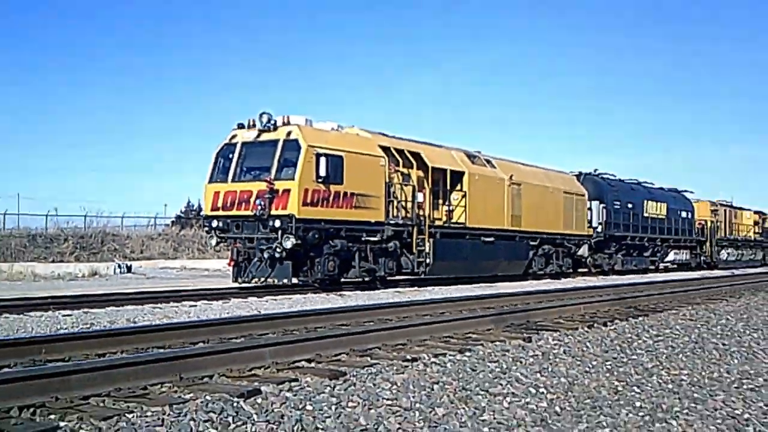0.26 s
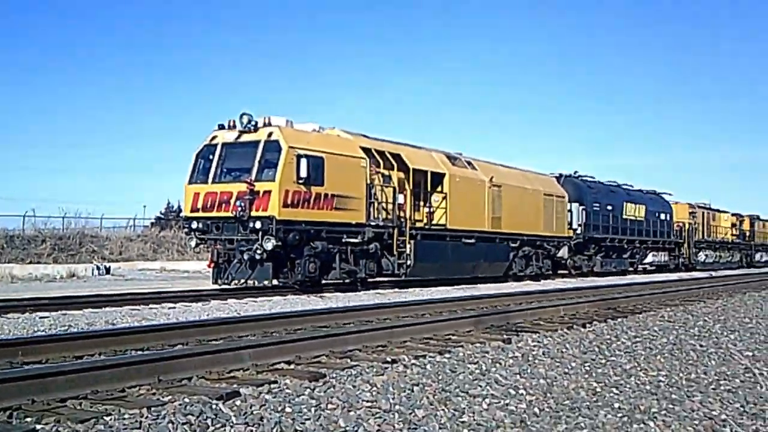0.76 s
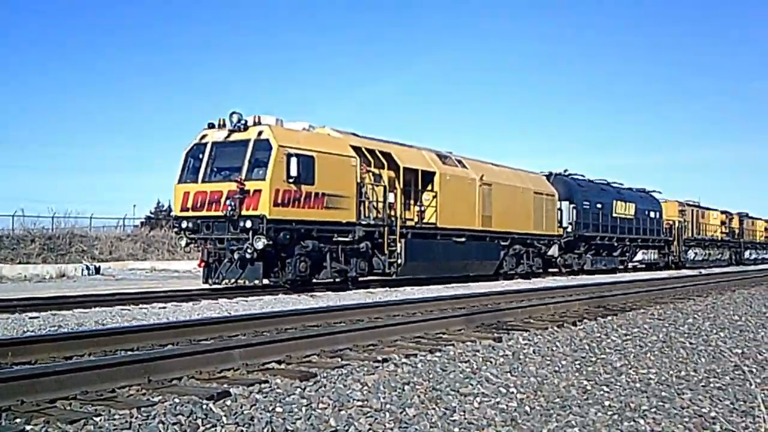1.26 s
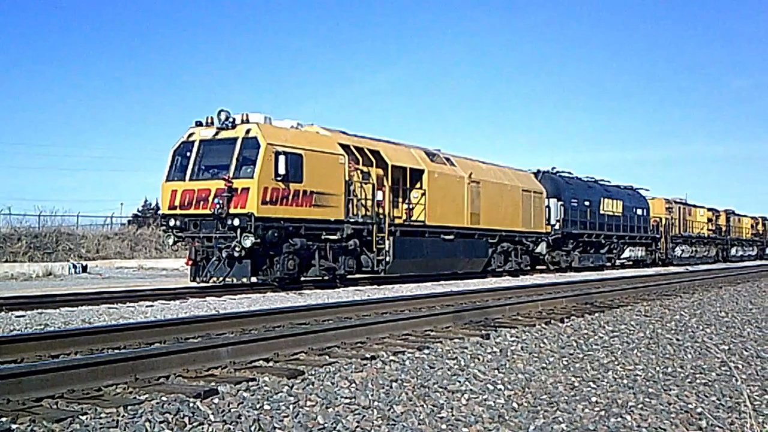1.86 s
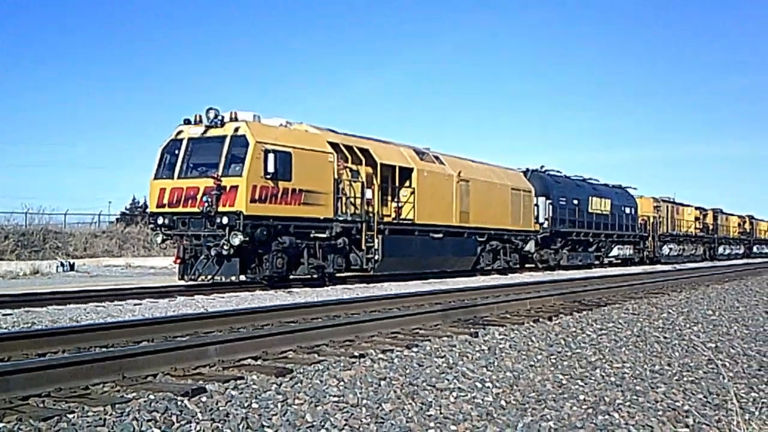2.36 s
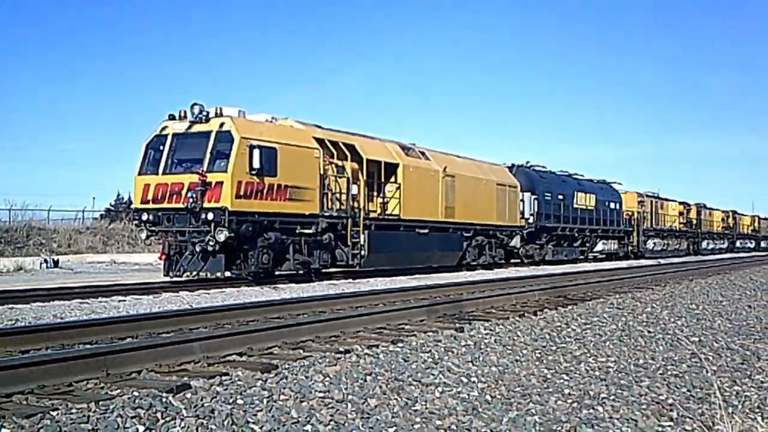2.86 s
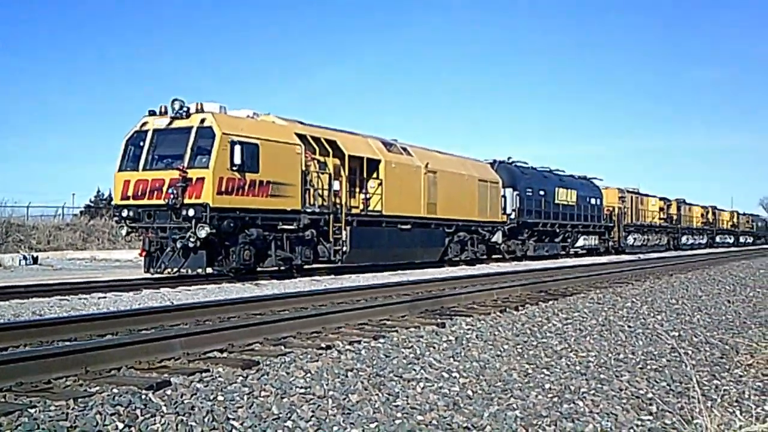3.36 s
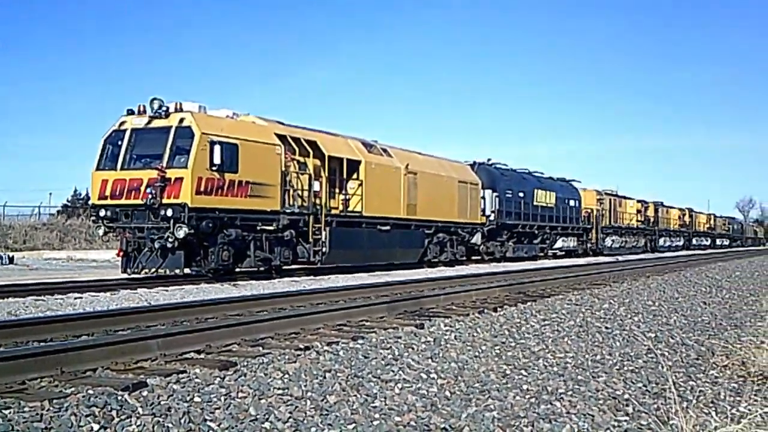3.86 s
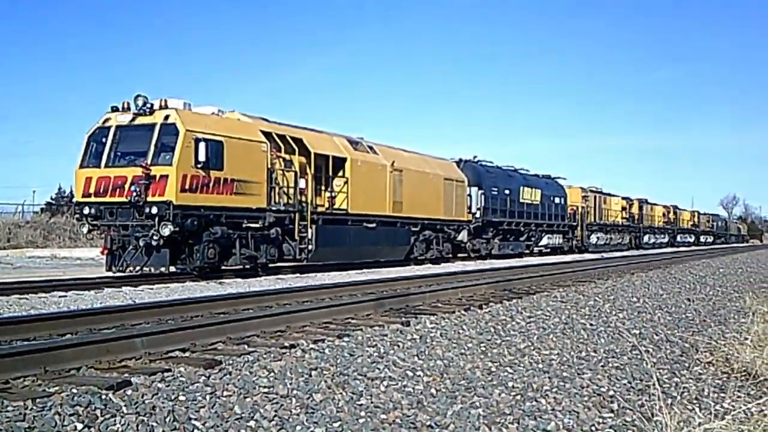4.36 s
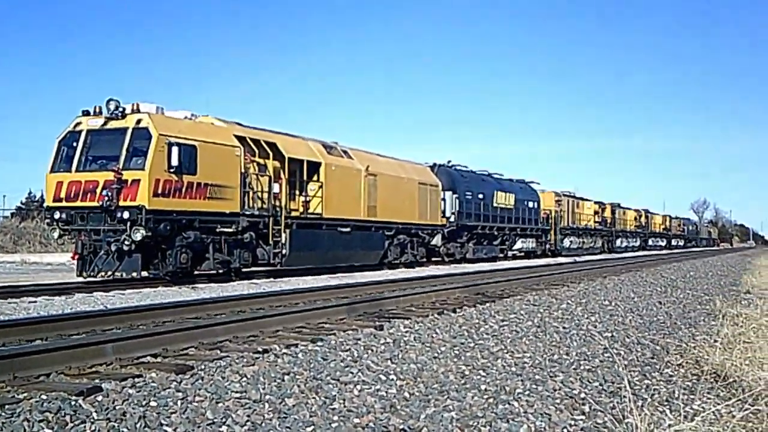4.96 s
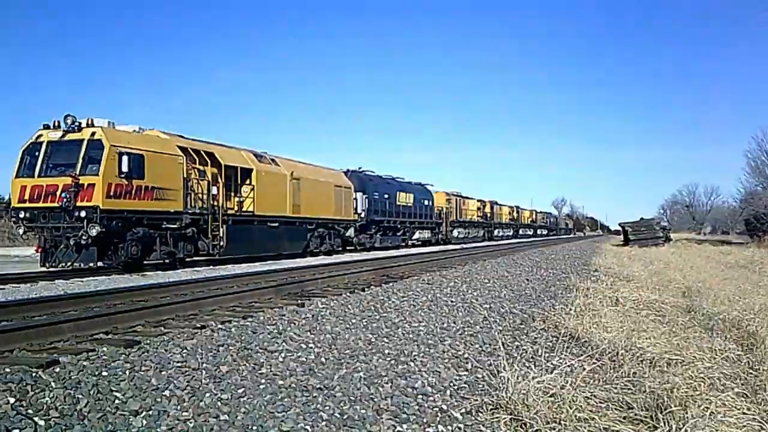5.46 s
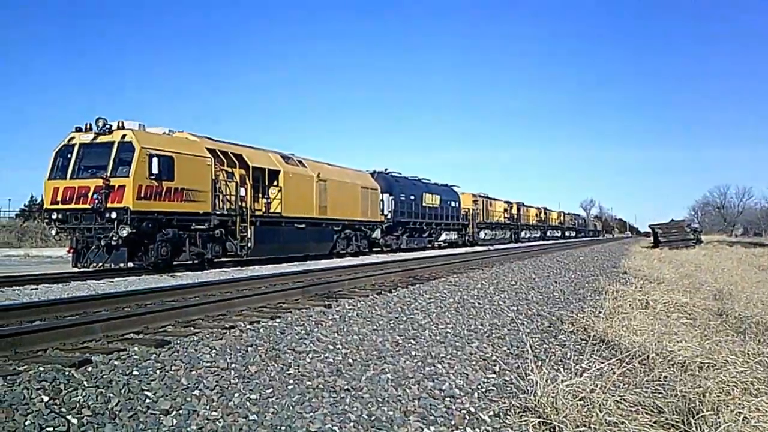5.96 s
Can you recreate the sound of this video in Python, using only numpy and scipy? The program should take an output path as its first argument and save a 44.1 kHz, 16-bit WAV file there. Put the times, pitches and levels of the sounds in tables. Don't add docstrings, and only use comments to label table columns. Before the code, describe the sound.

A large diesel idles in a steady low drone with humming hydraulic pump, roaring fans, clattering valves and a soft fast compressor thump, outdoors.

```python
import sys
import numpy as np
from scipy import signal
from scipy.fft import rfft, irfft, next_fast_len
from scipy.io import wavfile
from scipy.ndimage import uniform_filter1d

SR = 44100
rng = np.random.default_rng(int(sys.argv[2]) if len(sys.argv) > 2 else 0)


def nominal_scale(level):
    x = np.asarray(level, float) / 20
    return 10 ** x


def inscribe(sig):
    pcm = np.round(np.clip(np.atleast_2d(sig).T, -1, 1) * 32767)
    wavfile.write(sys.argv[1], SR, pcm.astype(np.int16))


N = 273411

CYCLE_HZ = 15.0013
LOST_AT_S, LOST_MS = 5.31513, 135.5
CURVE_HZ = 100
# cycle_multiple, level_db (rms)
DIESEL_ORDERS = [(6, -37.4), (9, -54.2), (11, -56.3), (12, -51.8), (16, -45.6), (32, -54.4), (33, -49.9),
                 (36, -50.3), (44, -57.0), (60, -56.8), (64, -57.2), (66, -52.0), (117, -61.5),
                 (130, -60.1), (136, -64), (164, -56.0)]


def evened(x):
    return x / np.sqrt(np.mean(x ** 2) + 1e-20)


def read(points, hz):
    f, value = np.transpose(points)
    return np.interp(np.log(hz + 1), np.log(f + 1), value, right=-100)


def coloured(x, gain):
    size = next_fast_len(len(x))
    hz = np.fft.rfftfreq(size, 1 / SR)
    return irfft(rfft(x, size) * gain(hz), size)[:len(x)]


def wander(top_hz, count):
    t = np.arange(N * CURVE_HZ // SR + 2) / CURVE_HZ
    hz = np.geomspace(top_hz / 20, top_hz, 16)[:, None]
    starts = rng.random((count, 16, 1))
    waves = np.sin(2 * np.pi * (hz * t + starts)) / np.sqrt(hz)
    return evened(waves.sum(1))


def spread(curve):
    return np.interp(np.arange(N) / SR * CURVE_HZ, np.arange(len(curve)), curve)


def machine_time():
    t = np.arange(N) / SR
    return t + (t > LOST_AT_S) * LOST_MS / 1000


def tones(lines, sway_db, sway_s, scatter=1):
    t = machine_time() + sway_s * spread(wander(2.7, count=1)[0])
    sways = wander(3.0, count=len(lines))
    starts = scatter * rng.random(len(lines))
    total = np.zeros(N)
    for (hz, db), sway, start in zip(lines, sways, starts):
        level = np.sqrt(2) * nominal_scale(db + sway_db * spread(sway))
        total += level * np.sin(2 * np.pi * (hz * t + start))
    return total


def patchy(x):
    patch_db = 1.19
    z = signal.stft(x, nperseg=1024, noverlap=768)[2]
    field = rng.standard_normal(z.shape)
    for size, axis in [(4, 0), (4, 0), (18, 1), (18, 1)]:
        field = uniform_filter1d(field, size=size, axis=axis)
    z = z * nominal_scale(patch_db * evened(field))
    return signal.istft(z, nperseg=1024, noverlap=768)[1][:len(x)]


def microphone_hiss():
    # hiss_hz, density_db (per Hz)
    hiss_spectrum = [(3000, -4.5), (4400, -3), (5900, -5.5), (6450, -17), (6900, -9), (7200, -1.5),
                     (8000, 1.5)]
    hiss_db = -77.5
    noise = rng.standard_normal(N)
    return nominal_scale(hiss_db) * evened(coloured(noise, lambda hz: nominal_scale(read(hiss_spectrum, hz)) * (hz > 2500)))


def puffs():
    # start_s, peak_db
    puff_times = [(0.133, -19.5), (0.59, -32), (1.029, -21.5), (1.832, -22.5), (2.594, -23), (3.059, -29),
                  (3.347, -26), (3.545, -27), (4.102, -21), (4.3, -26.5), (4.863, -21), (5.522, -22.5),
                  (6.06, -31)]
    fall_s, back_s, late_s = 0.01, 0.03, 0.032
    t = np.arange(-SR // 5, SR // 5) / SR
    dip = np.exp(-.5 * (t / fall_s) ** 2)
    swing_back = fall_s / back_s * np.exp(-.5 * ((t - late_s) / back_s) ** 2)
    out = np.zeros(N)
    for start_s, peak_db in puff_times:
        out[round(start_s * SR)] = nominal_scale(peak_db + 2.5)
    return signal.fftconvolve(out, swing_back - dip, "same")


def compressor():
    stroke_hz, first_stroke_s = 4.994, .044
    stroke_db, rise_s, leak_s = -23.5, 0.0078, .045
    since = (machine_time() - first_stroke_s) % (1 / stroke_hz)
    push = (1 - np.exp(-(since / rise_s) ** 2)) * np.exp(-since / leak_s)
    level = nominal_scale(stroke_db + 1.5 * spread(wander(2.1, count=1)[0]))
    return level * (push - push.mean())


def shafts():
    # pitch_hz, level_db (rms)
    shaft_lines = [(21.18, -38.8), (42.36, -47), (103.3, -58), (124.47, -55), (805.14, -64), (1207.74, -62),
                   (2012.84, -60)]
    return tones(shaft_lines, sway_db=-2.0, sway_s=3e-5)


def clatter():
    pattern = rng.standard_normal(2941)
    orders = rfft(pattern)
    orders[[0] + [int(k) for k, db in DIESEL_ORDERS]] = 0
    orders[:16] *= .3
    pattern = irfft(orders, len(pattern))
    place = machine_time() * CYCLE_HZ % 1
    return pattern[(place * len(pattern)).astype(int)]


def roar():
    # roar_hz, density_db (per Hz)
    roar_spectrum = [(8, -3), (60, -4), (120, -8.5), (250, -8.5), (900, -14), (1500, -17.5), (2200, -26.5),
                     (2800, -23)]
    # centre_hz, width_hz, gain_db
    casings = [(91, 32, -5), (197, 18, -3.5), (221, 23, 1.5), (281.5, 32, -4.5), (404.4, 50, -4.5),
               (543, 27, 2.5), (576, 80, 2), (749, 50, -5), (840, 110, 2.5), (1370, 160, 1.5),
               (1882, 140, 5), (2300, 110, 4), (3380, 210, 2.5), (4350, 140, 3.5)]
    # muffle_hz, gain_db
    muffle = [(2800, 0.5), (3500, -8.5), (4100, -21.5), (6300, -42.5)]
    roar_db, clatter_db = -32.5, -6.5
    turn_db_per_s, gust_db = -0.28, 0.17
    echo_ms, echo_share, rough_hz = 1.934, 0.39, 1110

    def path(hz):
        spectrum_db = read(roar_spectrum, np.minimum(hz, roar_spectrum[-1][0])) + read(muffle, hz)
        casing_db = sum(db / (1 + (2 * (hz - f) / width) ** 2) for f, width, db in casings)
        echo = echo_share / (1 + (hz / rough_hz) ** 2) * np.exp(-2j * np.pi * hz * echo_ms / 1000)
        return nominal_scale(spectrum_db) * (1 + echo) * nominal_scale(casing_db)

    drive = patchy(rng.standard_normal(N)) + nominal_scale(clatter_db) * clatter()
    carry_db = turn_db_per_s * np.arange(N) / SR + gust_db * spread(wander(1.1, count=1)[0])
    return nominal_scale(roar_db + carry_db - carry_db.mean()) * evened(coloured(drive, path))


def pump():
    # piston_multiple, level_db (rms)
    pump_orders = [(1, -36.6), (2, -49.3), (3, -41.4), (4, -48.5), (5, -41.7), (6, -44.8), (7, -61.3),
                   (8, -51.6), (9, -57.1), (12, -71.9), (14, -70.4)]
    piston_hz = 177.243
    lines = [(k * piston_hz, db - .7 + 0.062 * k) for k, db in pump_orders]
    return tones(lines, sway_db=1.1, sway_s=1.5e-5, scatter=0.46)


def diesel():
    lines = [(k * CYCLE_HZ, db) for k, db in DIESEL_ORDERS]
    return tones(lines, sway_db=1.05, sway_s=1.2e-5)


def scene():
    return (puffs() + compressor() + shafts() + roar() + pump() + diesel())[None]


def slow_sampling(x):
    camera_hz = 16000
    padded = np.pad(x, (882, 882 - N % 441), "reflect")
    lifted = coloured(padded, lambda hz: (hz < camera_hz / 2) / np.sinc(np.minimum(hz / camera_hz, .5)) ** 2)
    slow = signal.resample(lifted, len(lifted) // 441 * 160)[320:]
    return np.interp(np.arange(N) / SR, np.arange(len(slow)) / camera_hz, slow)


def lost_stretch_click():
    jump, settle_s = -.042, 0.0013
    t = np.arange(N) / SR
    return jump * (t > LOST_AT_S) * np.exp(-np.maximum(t - LOST_AT_S, 0) / settle_s)


def low_pass(x):
    return signal.sosfilt(signal.butter(12, 15750, fs=SR, output="sos"), x)


def record(dry):
    joined = slow_sampling(dry[0] + microphone_hiss()) + lost_stretch_click()
    return low_pass(joined[None])


dry = scene()
out = record(dry)
inscribe(out)
```